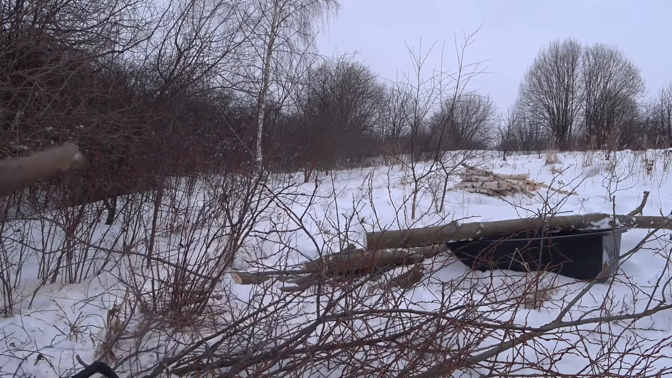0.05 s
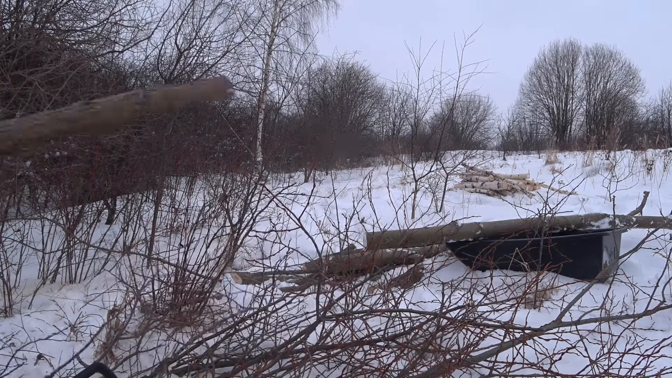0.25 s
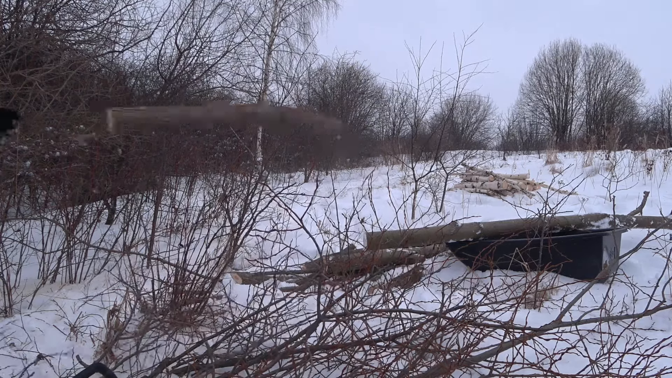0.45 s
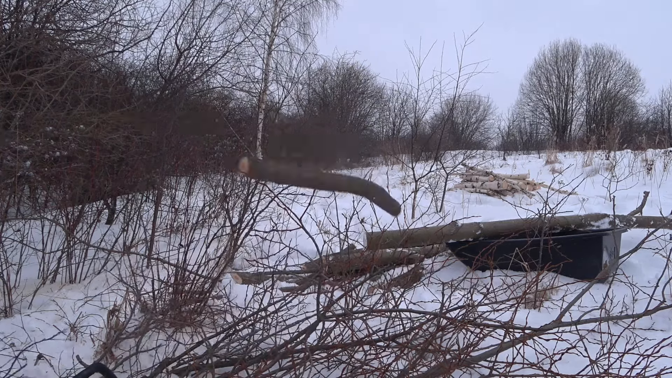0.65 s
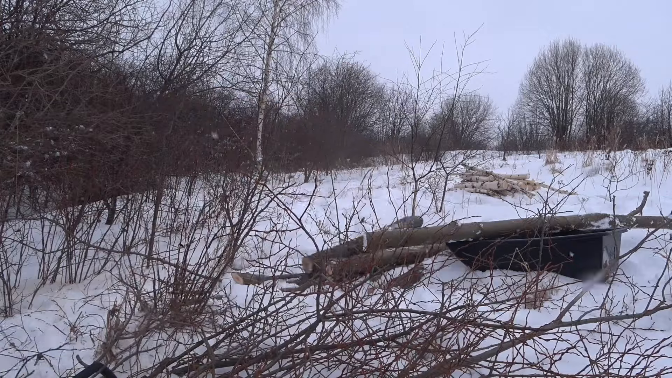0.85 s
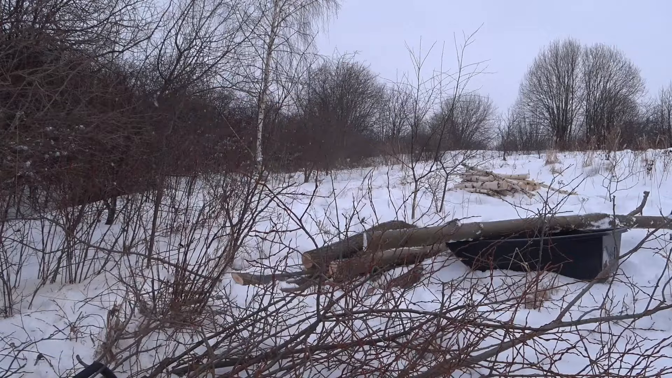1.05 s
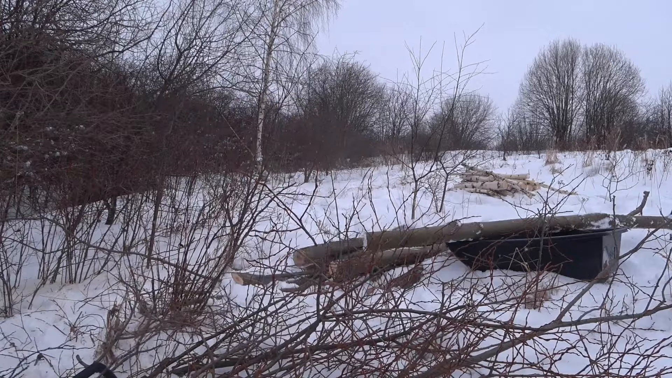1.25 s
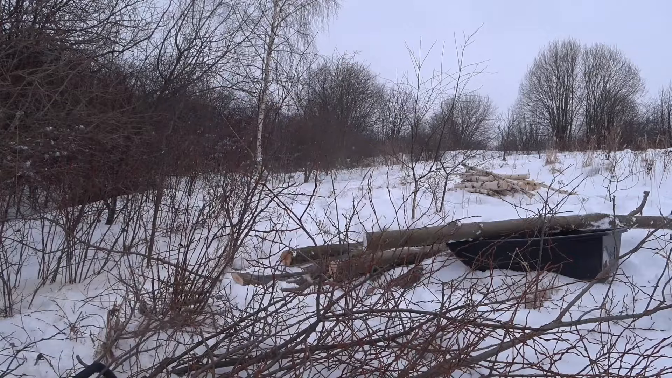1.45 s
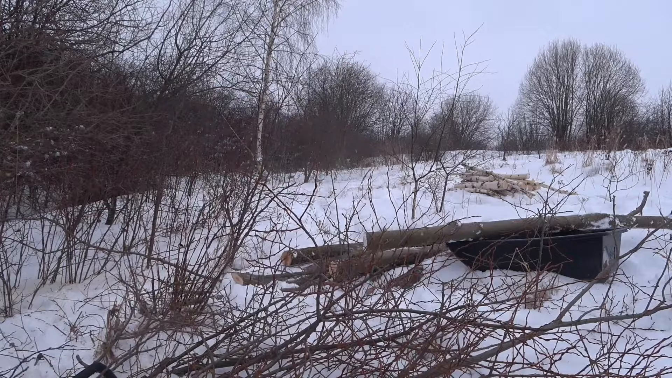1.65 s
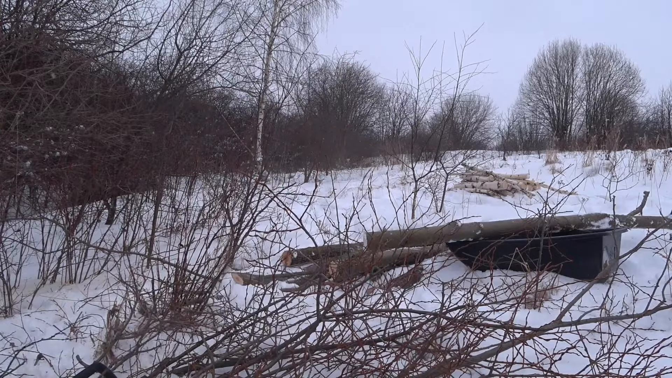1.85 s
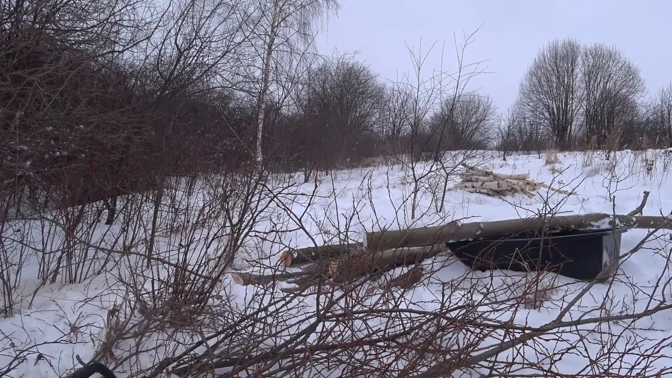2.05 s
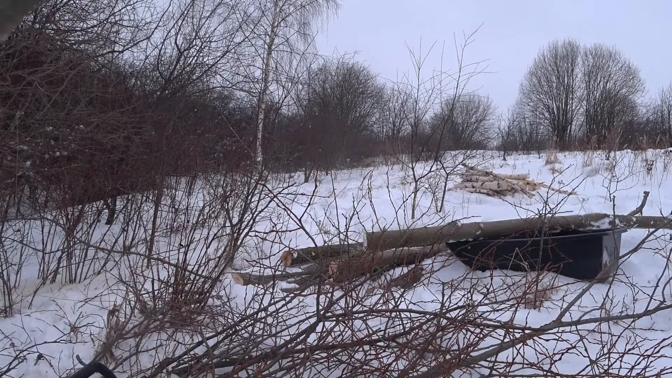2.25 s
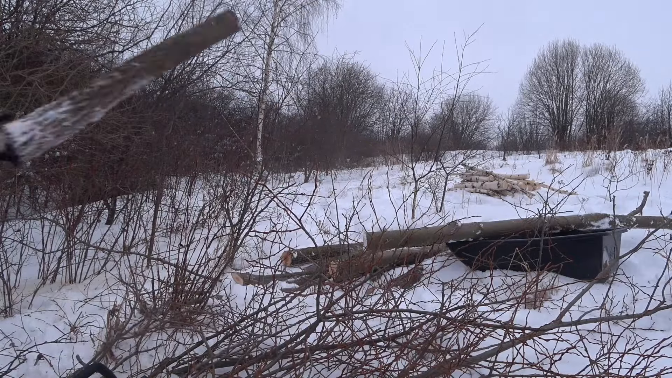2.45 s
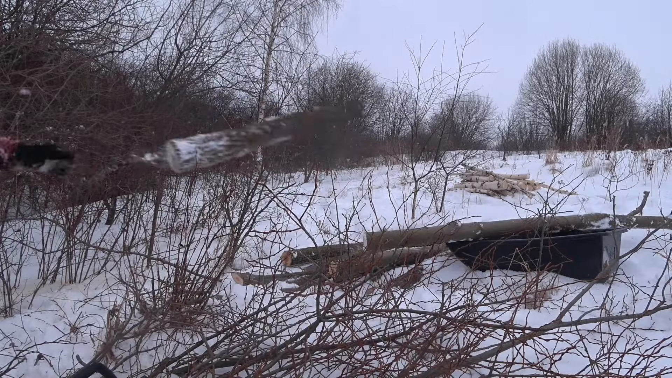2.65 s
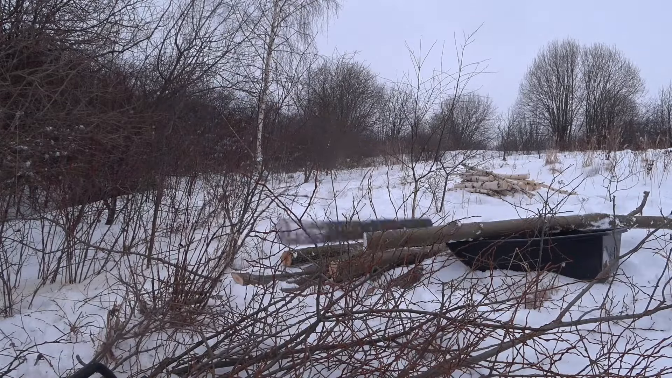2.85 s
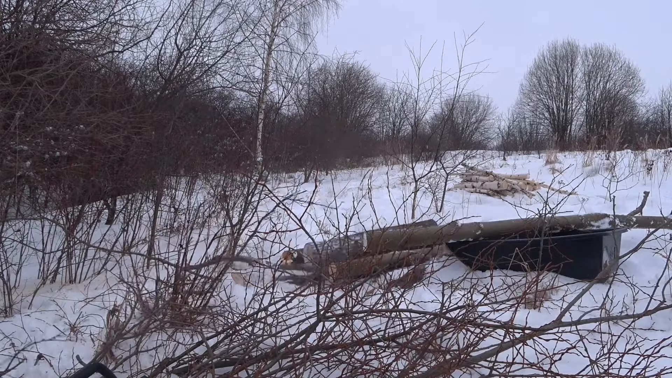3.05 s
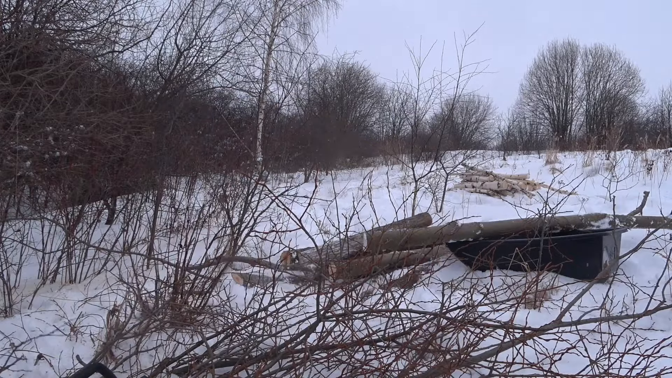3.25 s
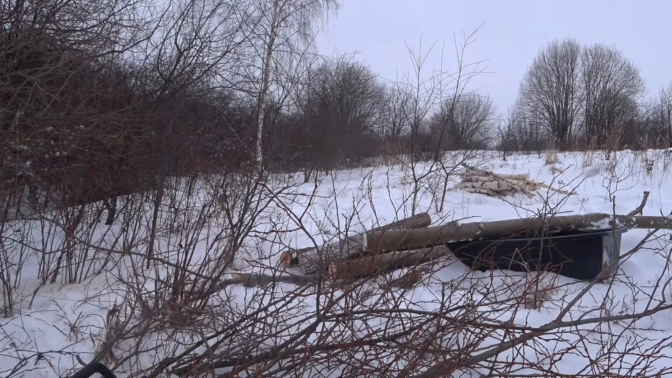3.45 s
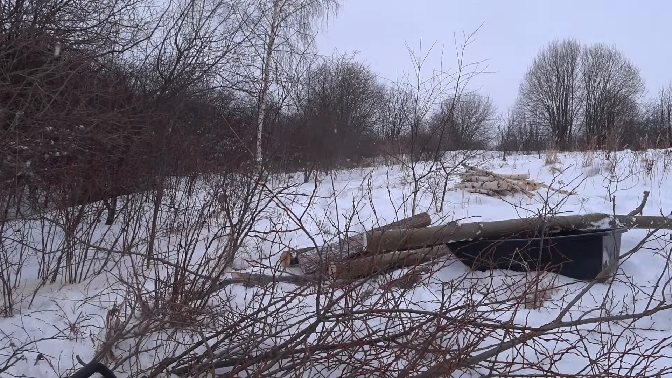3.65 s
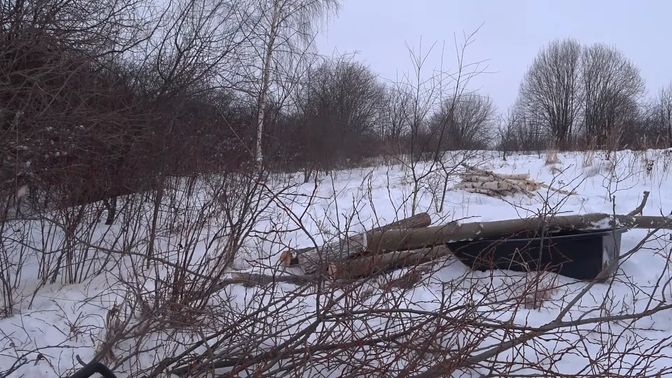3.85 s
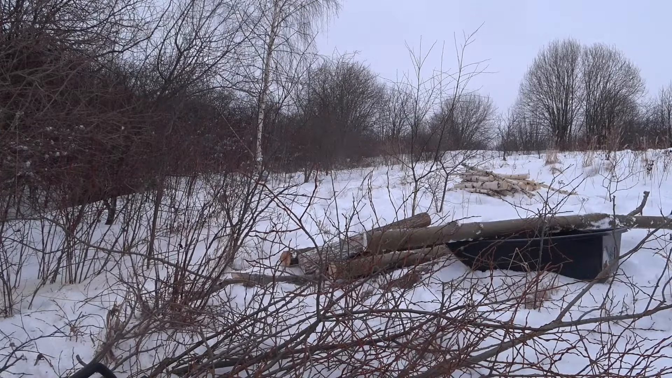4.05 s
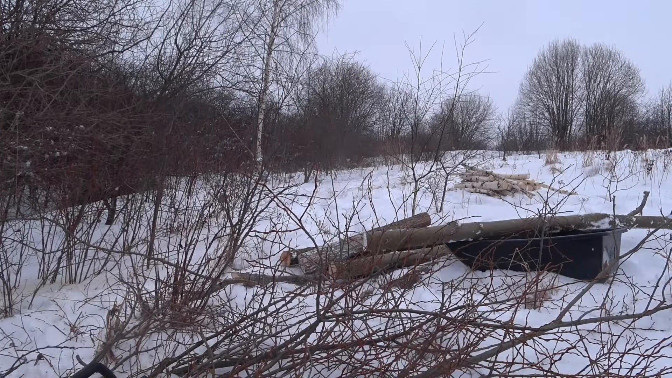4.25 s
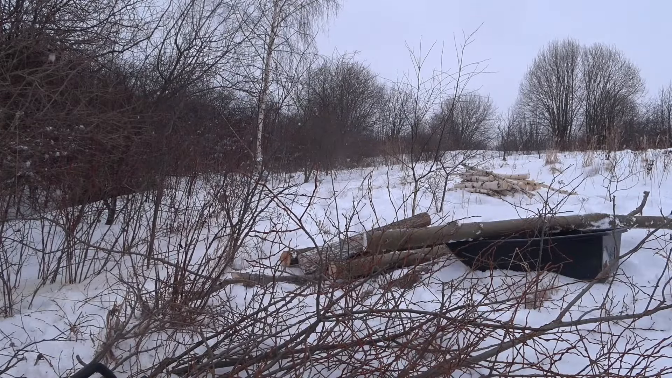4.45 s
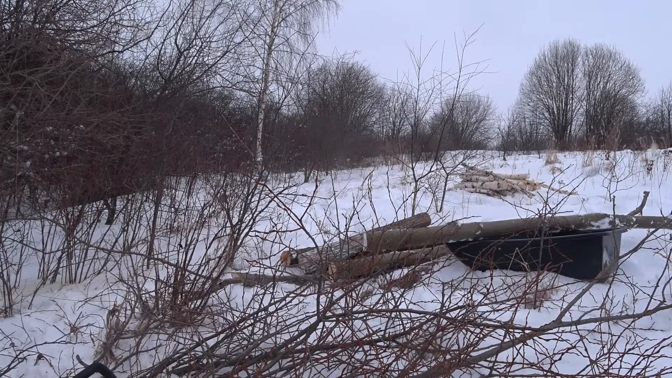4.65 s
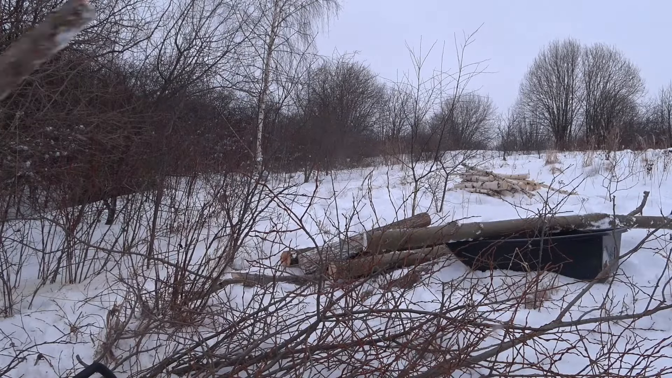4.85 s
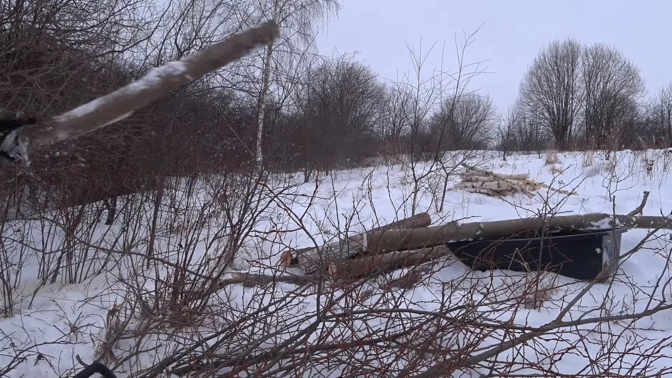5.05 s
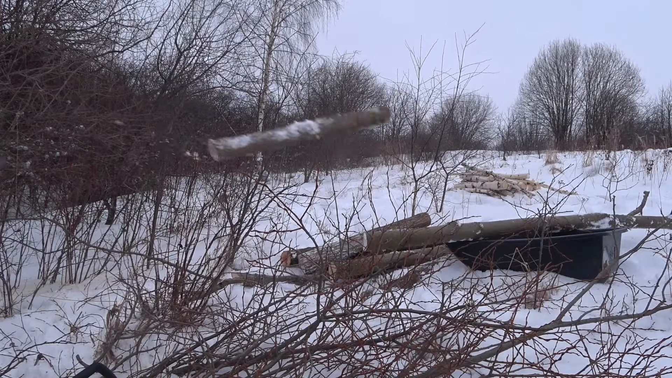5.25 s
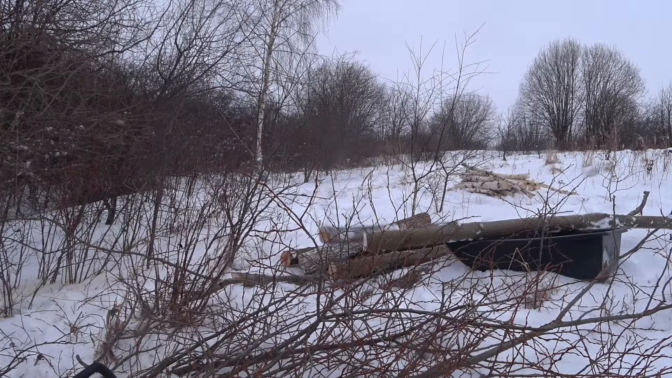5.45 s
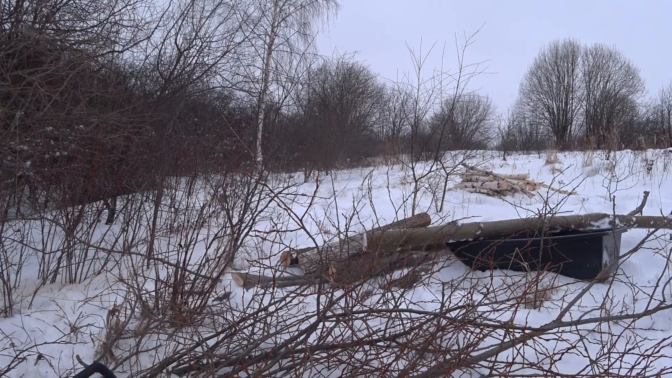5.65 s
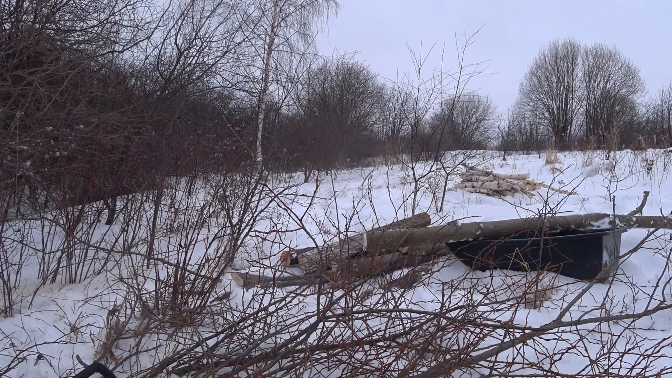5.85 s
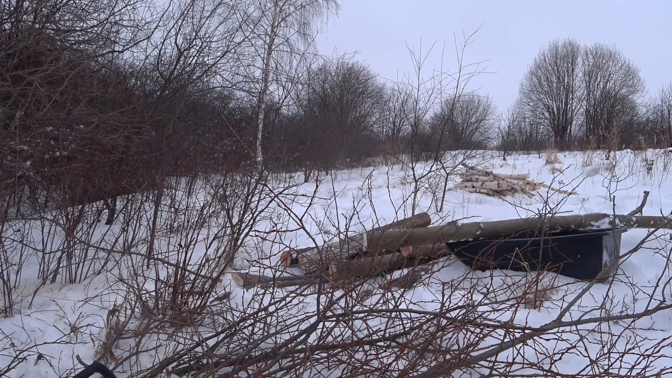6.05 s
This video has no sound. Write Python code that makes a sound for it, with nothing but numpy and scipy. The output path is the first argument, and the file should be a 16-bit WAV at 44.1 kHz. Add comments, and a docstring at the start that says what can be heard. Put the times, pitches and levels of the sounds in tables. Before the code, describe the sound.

Cut logs are tossed onto a wood stack in an open snowy field, with a distant road roaring faintly throughout. Clothes swish close on the left at the start, with soft thuds and small twig snaps. At about 0.7 seconds the first log lands and bounces in a cluster of sharp wooden knocks, cracking twigs and shaking down bark and snow. After quiet rustling, the second log hits at 2.9 seconds, the loudest knock, with a short clatter and trickle of debris. From 3.4 to 4 seconds the thrower's steps and handling give soft dry thuds and twig snaps on the left. A little wind rumbles on the microphone around 5.3 seconds. The third log lands at 5.5 seconds with a compact, slightly deeper knock and more snaps, followed by soft hisses of sliding snow until about 6 seconds. The knocks ring only briefly, with little echo.

```python
"""A snowy field, microphone by a log stack. Three cut logs are tossed on: each lands in a cluster of
knocks that ring its wooden modes, snaps twigs and shakes down bark and snow. Ground and brush return
a few dull echoes. The thrower's steps and handling give dry thuds; clothes and boots rustle close on
the left. A road roars softly in the distance and a little wind rumbles on the microphone."""
import sys
import numpy as np
from scipy import signal
from scipy.fft import rfft, irfft
from scipy.io import wavfile

SR = 44100
rng = np.random.default_rng(int(sys.argv[2]) if len(sys.argv) > 2 else 0)


def transcribe(u):
    """Save the signal u as a 16-bit wav file named by the first command-line argument.

    u: samples, shape (n,) or (channels, n), limited to [-1, 1]; the rate is SR.
    q: integer samples, one column per channel.
    """
    v = np.clip(np.atleast_2d(u).T, -1, 1)
    q = np.round(v * 32767).astype(np.int16)
    wavfile.write(sys.argv[1], SR, q)


N = 269892

# distant road: (frequency [Hz], density [dB])
ROAD_SPECTRUM = [(24, -85), (40, -48), (151, -28), (314, -8), (517, -3.5), (595, -0.5), (737, -0.5),
                 (1050, -5), (1460, -11), (2190, -18), (4460, -26), (10500, -29), (11500, -47),
                 (15000, -71), (22000, -120)]
# the road at the microphone: (time [s], level [dB])
ROAD_LOUDNESS = [(0.0, -52), (0.8, -54.5), (1.82, -53.5), (2.2, -55.5), (4.5, -55.5), (4.81, -53.5),
                 (5.3, -54.5), (6.12, -53)]
# its stereo image: (frequency [Hz], left-right correlation [clipped to 0..1 in use])
ROAD_CORRELATION = [(60, 2.5), (220, 0.94), (840, 0.83), (3120, -1.5), (11700, -3.8)]
# gusts on the microphone: (time [s], level [dB], rise [dB/s], fall [dB/s])
WIND_GUSTS = [(0.05, -74, 43, 34), (0.79, -66, 500, 92), (1.04, -61.5, 64, 150), (1.98, -80.5, 4, 19),
              (2.95, -64, 110, 55), (3.2, -68, 110, 108), (5.2, -56.5, 100, 60), (5.3, -47.5, 300, 200),
              (5.475, -49, 315, 200), (6.0, -58.5, 20, 32)]
# echoes off ground and brush: (left delay [s], level [dB])
FIELD_ECHOES = [(.007, -17), (.019, -24), (.029, -28)]

# cloth and coarse grit: (frequency [Hz], density [dB])
DULL_SPECTRUM = [(250, -40), (600, -7.5), (1200, 5.5), (2500, 1), (5000, -4.5), (11000, -12)]
# hiss of cloth, snow and fine bark: (frequency [Hz], density [dB])
BRIGHT_SPECTRUM = [(1200, -16), (3000, -11), (5000, -8.5), (7000, -4.5), (9000, -6.5), (11000, -5)]
# clothes and boots: (time [s], dull level [dB], bright level [dB], rise and fall [dB/s])
CLOTH_SWISHES = [(0.093, -41.5, -41.5, 296), (0.289, -54, -58, 74), (0.513, -72, -67, 158),
                 (1.26, -71, -64.5, 153), (1.36, -70, -56.5, 157), (1.48, -63, -72, 305),
                 (1.636, -59.5, -73, 218), (2.15, -69, -65, 250), (2.21, -62.5, -73, 198),
                 (2.38, -55, -66, 75), (2.532, -87, -61.5, 163), (2.705, -69, -64, 100),
                 (3.345, -64, -63, 230), (3.414, -52, -54.5, 302), (3.52, -60.5, -82, 200),
                 (3.59, -73, -74, 200), (4.03, -64, -72, 205), (4.25, -64, -82, 63), (4.681, -56, -51, 350),
                 (4.81, -58, -73, 112), (4.957, -58, -88, 125), (5.179, -54.5, -61, 138),
                 (5.378, -68, -65.5, 82), (6.11, -68, -64.5, 10)]
# loose snow sliding off a log: (time [s], level [dB])
SNOW_PUFFS = [(0.639, -52.5), (2.76, -56), (2.799, -51), (5.527, -42), (5.561, -40.5), (5.659, -53),
              (5.709, -42), (5.785, -49.5), (5.889, -53)]
# debris trickling after each landing: (time [s], dull level [dB], bright level [dB])
DEBRIS_TRICKLES = [(0.82, -51.5, -48), (2.93, -47, -41), (5.52, -60, -51)]

# twigs and bark breaking: (time [s], peak level [dB], thinness [dB], left over right [dB])
TWIG_SNAPS = [(0.215, -41, -12, 9), (0.2977, -33.5, 1, 4), (0.3639, -37.5, 4, 7), (0.3859, -42, 1, 3),
              (0.4283, -43, -11, 9), (0.5072, -27, -3.5, 5), (0.5482, -37.5, -8, 7), (0.5623, -40, 3, -1),
              (0.7387, -22, 5, -4), (0.7624, -29, -11, 0), (0.769, -29, 1, -1), (0.791, -25, -3, -3),
              (0.8111, -24, 0, 2), (0.8147, -5, 3, -3), (0.824, -13.5, 3.5, 1), (0.8255, -14, 15, -2),
              (0.839, -18.5, 7, -2), (0.8564, -26, 6, 1), (0.885, -21, 14, -1), (0.919, -28, 3.5, -3),
              (1.0895, -24, 10, -2), (1.1102, -34, 12, -4), (1.131, -42.5, -12, 9), (1.1661, -41, 6, -1),
              (2.0512, -41.5, -14, 5), (2.6266, -42, 20, 14), (2.6441, -45.5, -6, 17),
              (2.8287, -38, -2, -1), (2.8467, -36.5, 7, -1), (2.9003, -16, 9, -8), (2.904, -19, 17, 0),
              (2.918, -20, 5, 5), (2.921, -28, -11, -2), (2.9255, -19, 1, -1), (2.9282, -12.5, 8, -6),
              (2.9318, -11, 3, -1), (2.951, -22, 13, -1), (2.9566, -22, 8, -2), (3.0088, -36, 10, -4),
              (3.082, -29, 9, -3), (3.387, -33, 10, -3), (3.4352, -46, 7, -4), (3.5072, -22.5, 3.5, 9),
              (3.5485, -47, 0, -1), (3.575, -34.5, -12, 8), (3.7336, -43, -23, 8), (3.7405, -55, -6, 11),
              (3.8206, -51, -11, 9), (3.8817, -29, -0.5, 9), (3.8855, -27, -0.5, 6),
              (3.8936, -33.5, -10, 3), (3.9057, -22, 9.5, 10), (3.9231, -31.5, 5, 7), (3.9356, -37, 8, 7),
              (5.2706, -40, 19, 12), (5.5017, -22.5, 17, 6), (5.5098, -14.5, 12, -8), (5.5122, -25, 0, -5),
              (5.5239, -28, 5, -2), (5.5312, -18.5, 17, -2), (5.6515, -22.5, 13, -5), (6.0939, -38, 4, 8)]
# low, middle and high band of a snap: (lower edge [Hz], upper edge [Hz])
TWIG_BANDS = [(1900, 3700), (3700, 7000), (7000, 14000)]
# wooden knocks at the stack, and dry thuds of the thrower's steps and handling: (time [s], level [dB],
# hardness [dB/octave], deep mode boost [dB], ring time [ratio to the mode's own], left over right [dB])
KNOCKS_AND_THUDS = [(0.312, -32, -5, -19, .5, 1.5), (0.507, -29.5, -1.5, -19, 0.39, 0),
                    (0.736, -14.5, 2.5, -12, 0.58, -2), (0.738, -16, -4, -3.5, 0.26, 0),
                    (0.761, -42.5, 16, -6, 1, -2), (0.773, -31.5, 1, -8, 1, -3),
                    (0.789, -29, 5, 13, 1.45, 1), (0.824, -21.5, 0.5, 1, 1.07, -2.5),
                    (0.832, -34, -3, -1, 1, 5), (0.84, -19, -8, -9, 0.47, 0),
                    (0.851, -25, -1.5, 3.5, 0.81, 2), (0.861, -27, 4.5, -7, 0.77, -3),
                    (0.87, -28.5, 0, -19, 1.02, -3), (2.903, -11, 3.5, -1, 0.84, -6.5),
                    (2.905, -1.5, 0.5, -21, 0.72, -1), (2.92, -10.5, 12, -8, 0.55, 1),
                    (2.924, -22, 12, -8, 0.89, -6), (2.93, -18, 13.5, 8, 0.68, -1),
                    (2.94, -19, 5, 1, 0.54, -2.5), (2.952, -29, -9, -6, 0.75, -1),
                    (2.964, -26.5, 3, -8, .77, -2), (3.021, -27, -5, -17, .7, -1.5),
                    (3.04, -37, -8, -7, 0.97, -5), (3.506, -43, 13.5, -4, 0.88, 6),
                    (3.572, -31.5, 0, 5, 0.54, 1), (3.883, -34, -10, -18, .5, 1),
                    (3.99, -43, -10, -4, 0.59, 2), (5.501, -12.5, 1.5, -6, 0.62, 0),
                    (5.503, -8.5, 5.5, -1, .7, -3.5), (5.513, -11.5, 6.5, 15.5, 0.36, -2),
                    (5.522, -23, -1, 3, 0.5, 4), (5.553, -29.5, -2, 7.5, 0.98, 0),
                    (5.657, -49, 13, 1, 1.1, -7), (6.031, -58, -7, -15, 0.54, 2)]
# modes of each log, the deep mode first: (frequency [Hz], level [dB], ring time to -60 dB [s])
LOG_MODES = [
    [(221.3, -14.5, 0.4), (330, -9.5, 0.089), (426, 5.5, 0.037), (525, 2.5, 0.064), (606, -7, 0.23),
     (801, -0.5, 0.049), (945, 0.5, 0.064), (1038, -5.5, 0.039), (1344, -7.5, 0.038), (1617, -14, 0.067),
     (2080, -11, 0.026), (2540, -29, 0.031)],
    [(297, -11.5, 0.18), (205, -15, 0.055), (500, -5, 0.031), (576, -0.5, 0.044), (676, -2.5, 0.062),
     (727, -8.5, 0.1), (905, -7.5, 0.061), (972, -7.5, 0.076), (1078, -1, 0.046), (1356, 4, 0.016),
     (1720, -15.5, 0.029), (2075, -16.5, 0.023)],
    [(256.2, -11, 0.43), (192, -36, 0.027), (280, -5, 0.057), (480, -5, 0.048), (557, -0.5, 0.06),
     (633.4, 5.5, 0.092), (958, 6.5, 0.021), (1059, 1.5, 0.041), (1148, -2, 0.051), (1445, -13, 0.035),
     (1690, -14, 0.031), (2090, -33, .04)],
]
# from here on the next log's modes are used: (time [s])
LOG_CHANGES = [1.5, 4.5]
# each log beds down in the stack, which stops its ring: (time [s])
LOG_SETTLES = [0.95, 3.03, 5.645]


def from_db(db):
    """Decibels to gain."""
    return 10 ** (np.asarray(db) / 20)


def rms_one(x):
    """Scale to unit rms."""
    return x / np.sqrt(np.mean(x ** 2) + 1e-20)


def per_bin(curve):
    """Read a curve at every FFT bin, on a log-frequency axis."""
    bin_hz = np.maximum(np.fft.rfftfreq(N, 1 / SR), 10)
    hz, values = np.transpose(curve)
    return np.interp(np.log(bin_hz), np.log(hz), values)


def coloured(white, spectrum):
    """Shape noise by a spectrum; rms 1."""
    return rms_one(irfft(rfft(white) * from_db(per_bin(spectrum)), N))


def panned(x, pan_db):
    """Place a sound in the stereo image; positive is left."""
    return np.array([x * from_db(pan_db / 2), x * from_db(-pan_db / 2)])


def add(out, x, at_s):
    """Mix a short stereo sound in at its time."""
    start = round(at_s * SR)
    out[:, start:start + x.shape[1]] += x[:, :N - start]


def drift(rate_hz):
    """Slow random wander: noise through a double one-pole low-pass, spread 1."""
    step, warm_up = 40, 2000   # samples per point, points
    pole = np.exp(-2 * np.pi * rate_hz * step / SR)
    white = rng.standard_normal(N // step + warm_up + 2)
    slow = signal.lfilter([1], [1, -2 * pole, pole * pole], white)[warm_up:]
    return np.interp(np.arange(N) / step, np.arange(len(slow)), rms_one(slow))


def swells(times, levels_db, rise_db_s, fall_db_s, hold_s=0):
    """Envelope of events that rise, hold either side of their time and fall, summed as power."""
    t = np.arange(0, N + 16, 16) / SR
    power = 0
    for at, top_db, rise, fall in np.broadcast(times, levels_db, rise_db_s, fall_db_s):
        drop_db = np.where(t < at, rise, fall) * np.maximum(abs(t - at) - hold_s, 0)
        power = power + from_db(top_db - drop_db) ** 2
    return np.interp(np.arange(N) / SR, t, np.sqrt(power))


def distant_road():
    """Far off: a smooth roar, centred in the bass and wide in the treble."""
    alike = np.clip(per_bin(ROAD_CORRELATION), 0, 1)
    mid, side = rfft(rng.standard_normal((2, N)))
    stereo = np.sqrt(1 + alike) * mid + np.sqrt(1 - alike) * side * [[1], [-1]]
    roar = rms_one(irfft(stereo * from_db(per_bin(ROAD_SPECTRUM)), N))
    level_db = np.interp(np.arange(N) / SR, *np.transpose(ROAD_LOUDNESS))
    return from_db(level_db + 0.72 * drift(8.1)) * roar


def microphone_wind():
    """Right on the microphone: a lumpy low rumble, partly its own at each port."""
    white = rng.standard_normal((3, N))
    shared, per_port = white[0], white[1:]
    band = signal.butter(2, [80, 300], "band", fs=SR, output="sos")
    rumble = rms_one(signal.sosfilt(band, shared + 1.45 * per_port))
    strength = swells(*np.transpose(WIND_GUSTS)) + from_db(-86.5)   # gusts over the lull
    return strength * from_db(4 * drift(24)) * rumble


def field_echoes(blows):
    """Ground and brush nearby return dull echoes, each to the opposite channel."""
    dull = signal.sosfilt(signal.butter(2, 2200, fs=SR, output="sos"), blows)
    out = np.zeros_like(blows)
    for delay_s, echo_db in FIELD_ECHOES:
        for side, stretch in enumerate([1, 1.143]):   # later on the right
            lag = round(delay_s * stretch * SR)
            out[side, lag:] += from_db(echo_db) * dull[1 - side, :N - lag]
    return out


def clothes():
    """The thrower's clothes and boots: dull and bright envelopes of swishes over a faint stir."""
    times, dull_db, bright_db, pace = np.transpose(CLOTH_SWISHES)
    dull = swells(times, dull_db, pace, pace, hold_s=0.012) + from_db(-76.5)
    bright = swells(times, bright_db, pace, pace, hold_s=0.012) + from_db(-71)
    return dull, bright


def debris(blows, burst_db, trickle_s, trickle_db):
    """Envelope of bark and snow shaken loose: a burst at every blow, a trickle after each landing."""
    times, blow_db = np.transpose(blows)[:2]
    bursts = swells(times, blow_db + burst_db, rise_db_s=4013, fall_db_s=691)
    trickles = swells(trickle_s, trickle_db, rise_db_s=4013, fall_db_s=65)
    return np.hypot(bursts, trickles)


def rustle():
    """Uneven grains on noise: dull cloth close on the left, grit and bright hiss near the centre."""
    sizes = from_db(4.75 * np.minimum(rng.exponential(1, (2, N)), 5)) * rng.choice([-1, 1], (2, N))
    grains = rms_one(sizes * (rng.random((2, N)) < 2500 / SR))   # 2500 a second
    texture = 0.66 * grains + rng.standard_normal((2, N))
    dull = coloured(texture[0], DULL_SPECTRUM) * from_db(1.8 * drift(40))
    bright = coloured(texture[1], BRIGHT_SPECTRUM) * from_db(1.94 * drift(28))

    cloth_dull, cloth_bright = clothes()
    trickle_s, dull_db, bright_db = np.transpose(DEBRIS_TRICKLES)
    puffs = swells(*np.transpose(SNOW_PUFFS), rise_db_s=900, fall_db_s=700, hold_s=0.0076)
    spray = debris(TWIG_SNAPS, burst_db=-21.5, trickle_s=trickle_s, trickle_db=bright_db)
    grit = dull * debris(KNOCKS_AND_THUDS, burst_db=-27.5, trickle_s=trickle_s, trickle_db=dull_db)
    cloth = dull * cloth_dull
    hiss = bright * (cloth_bright + puffs + spray)
    # brush scatters a little back, late and opposite in the two channels
    scatter = from_db(-8.5) * np.roll(cloth + grit + hiss, SR // 90) * [[1], [-1]]
    return panned(cloth, pan_db=7) + panned(grit + hiss, pan_db=-0.5) + scatter


def twig_snaps():
    """One break, then uneven splintering that dies at once; thin twigs are bright, thick ones dull."""
    out, t = np.zeros((2, N)), np.arange(SR // 20) / SR
    shape = (len(TWIG_SNAPS), len(t))
    splinters = rng.standard_normal(shape) * from_db(1.6 * rng.standard_normal(shape))
    splinters[:, 8] = 5   # the break itself
    fade = np.exp(-t / 0.00028) + 0.25 * np.exp(-t / 0.0047)   # crack and short tail
    bands = [signal.butter(2, edges, "band", fs=SR, output="sos") for edges in TWIG_BANDS]
    for (at_s, peak_db, thin_db, pan_db), burst in zip(TWIG_SNAPS, splinters):
        parts = np.array([signal.sosfilt(band, burst * fade) for band in bands])
        parts /= np.abs(parts).max(axis=1, keepdims=True)
        band_gains = from_db([-4 - thin_db, 0, -1.5 + thin_db]) * [1, -1, 1]
        snap = band_gains @ parts
        add(out, panned(from_db(peak_db) * snap / np.abs(snap).max(), pan_db), at_s)
    return out


def knocks_and_thuds(contact_s=0.0014, settle_decay_s=0.031):
    """Wooden knocks at the stack, dry thuds of steps and handling: modes build in contact, then decay."""
    out, t = np.zeros((2, N)), np.arange(SR // 2) / SR
    spreads = 2 * rng.standard_normal((len(KNOCKS_AND_THUDS), len(LOG_MODES[0])))
    for (at_s, blow_db, hardness, deep_db, ring_ratio, pan_db), spread in zip(KNOCKS_AND_THUDS, spreads):
        log = np.searchsorted(LOG_CHANGES, at_s)
        hz, mode_db, t60 = np.transpose(LOG_MODES[log])
        level_db = mode_db + hardness * np.log2(hz / 640) + spread
        level_db[0] += deep_db
        signs = np.where(hz < 800, 1, -1)   # the upper modes start in the opposite sense
        decays = from_db(-60 * t / (t60[:, None] * max(ring_ratio, 0.2)))
        modes = decays * np.sin(2 * np.pi * hz[:, None] * t)
        ring = (signs * from_db(level_db)) @ modes
        envelope = 1 - np.exp(-(t / contact_s) ** 2)
        if at_s < LOG_SETTLES[log]:
            envelope *= np.exp(-np.maximum(at_s + t - LOG_SETTLES[log], 0) / settle_decay_s)
        add(out, panned(from_db(blow_db - 8) * envelope * ring, pan_db), at_s)
    return out


def scene():
    """At the microphone: blows and their echoes over rustle, road and wind."""
    low_cut = signal.butter(2, 170, "high", fs=SR, output="sos")   # deep bass is taken out of the knocks and snaps
    blows = signal.sosfilt(low_cut, knocks_and_thuds() + twig_snaps())
    return blows + field_echoes(blows) + rustle() + distant_road() + microphone_wind()


def record(dry):
    """The treble is cut steeply above 10.9 kHz."""
    return signal.sosfilt(signal.ellip(10, 0.1, 65, 10900, fs=SR, output="sos"), dry)


dry = scene()
out = record(dry)
transcribe(out)
```